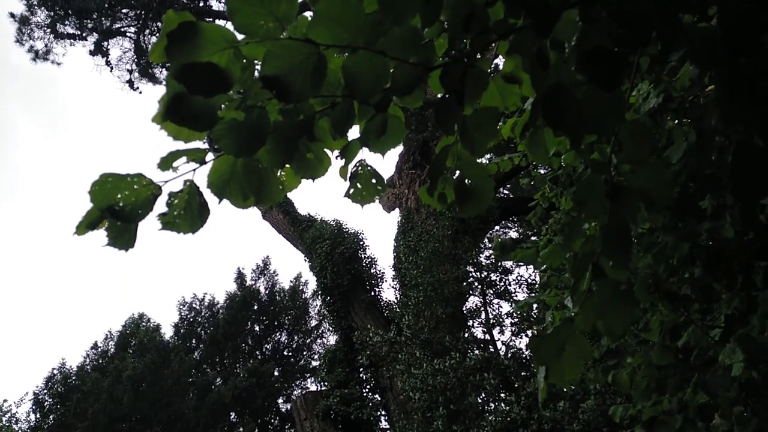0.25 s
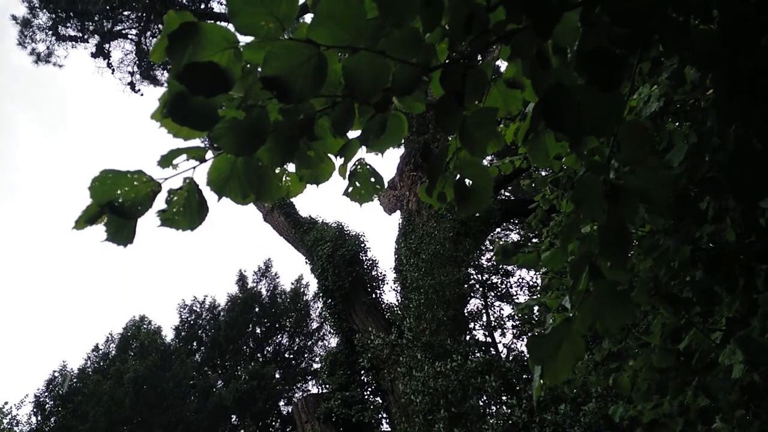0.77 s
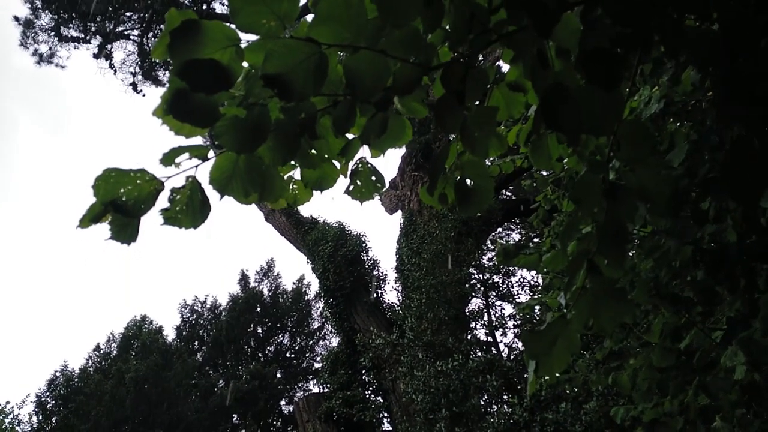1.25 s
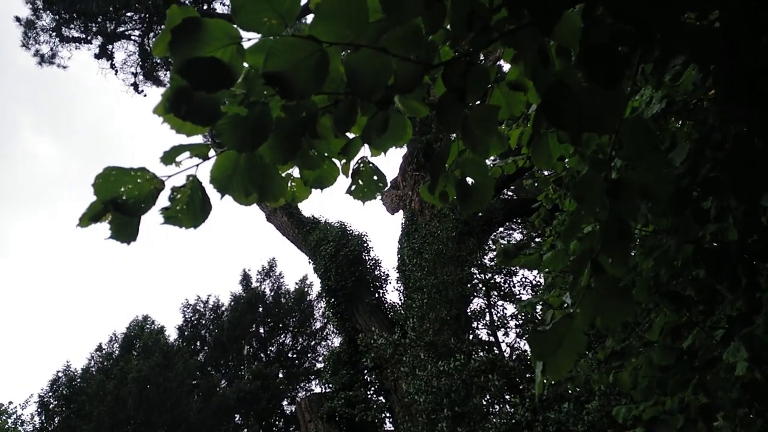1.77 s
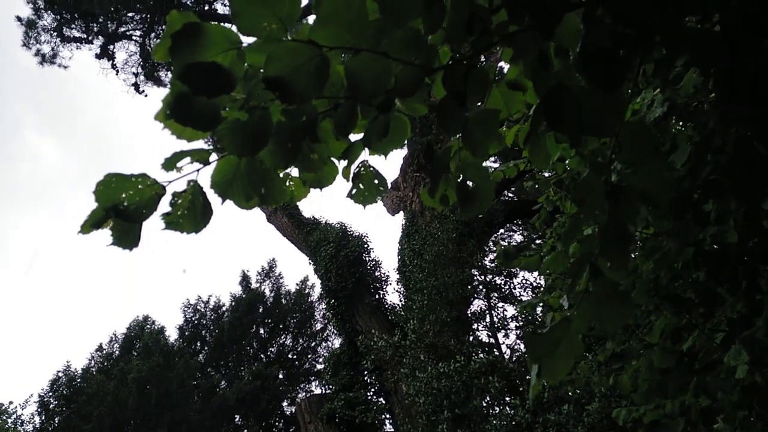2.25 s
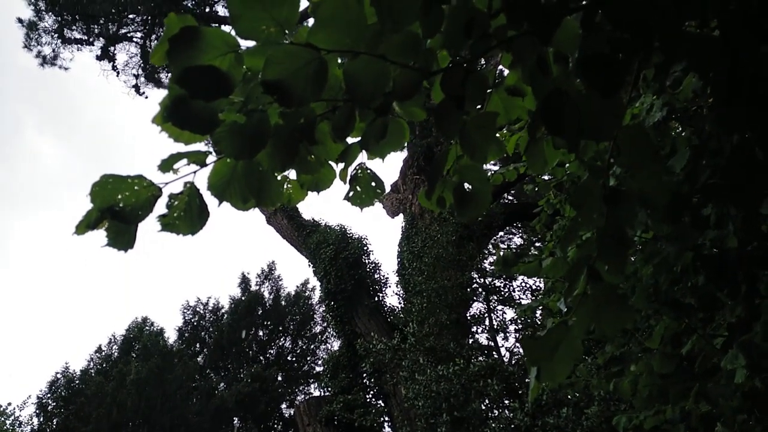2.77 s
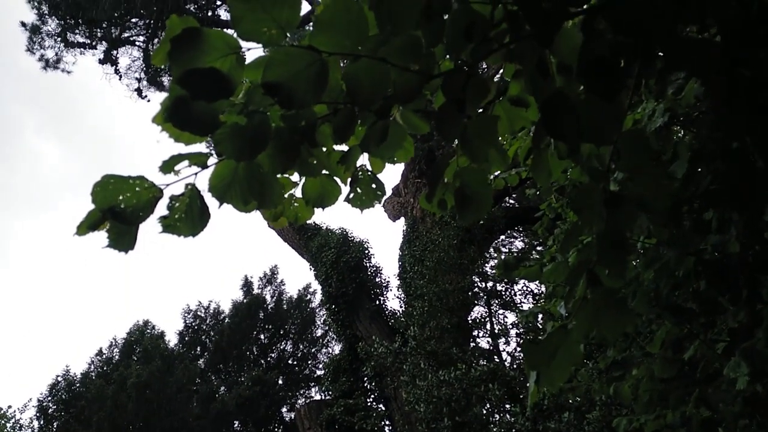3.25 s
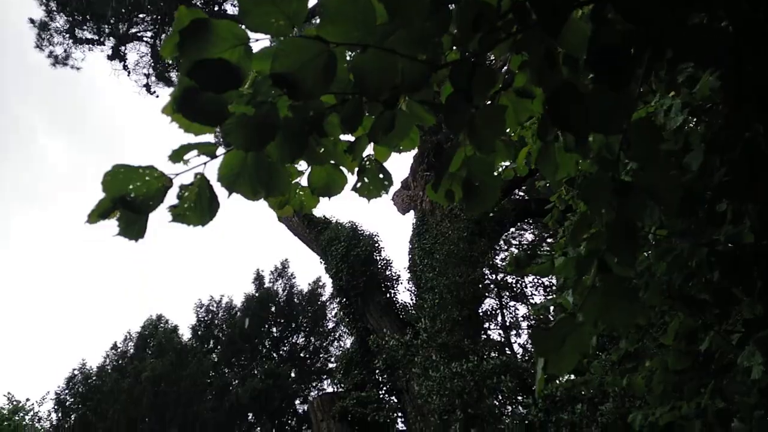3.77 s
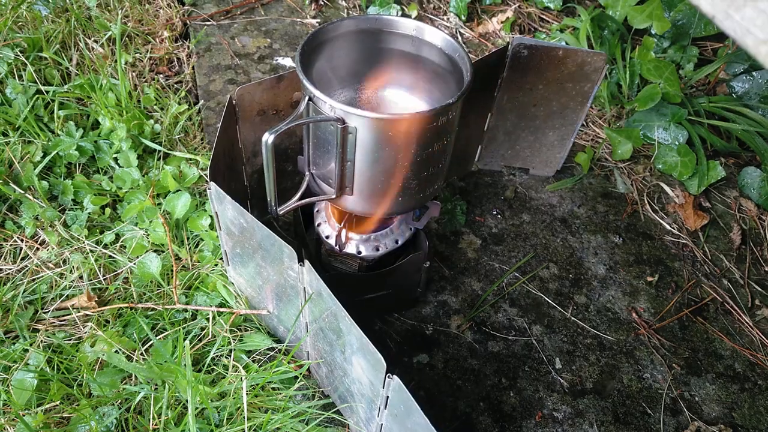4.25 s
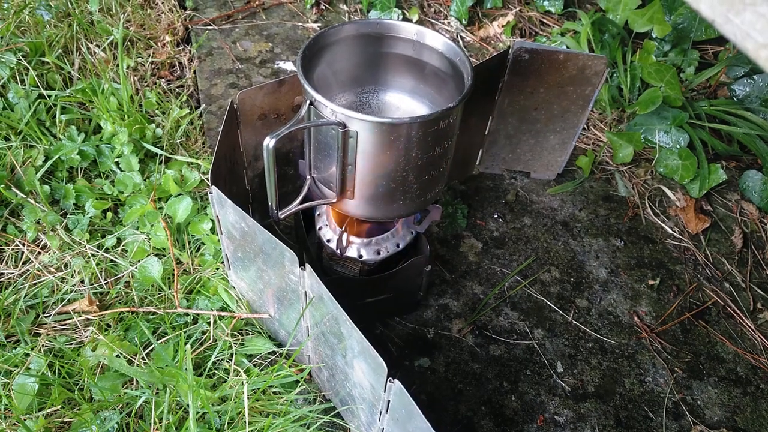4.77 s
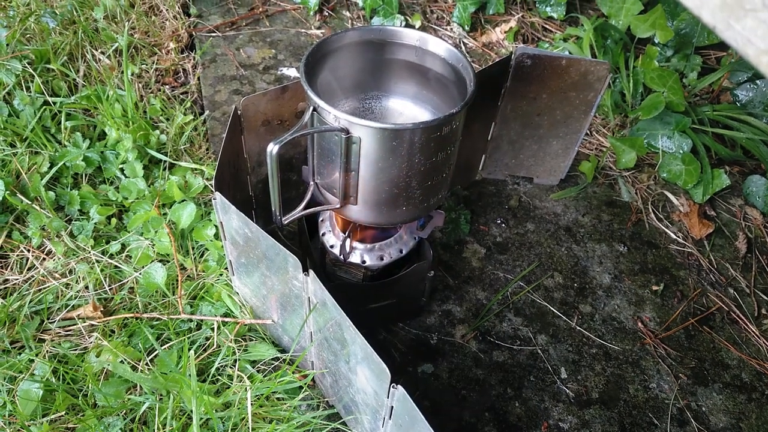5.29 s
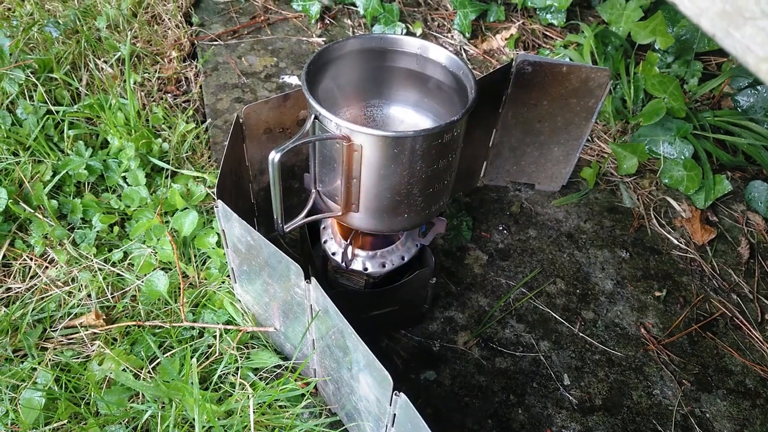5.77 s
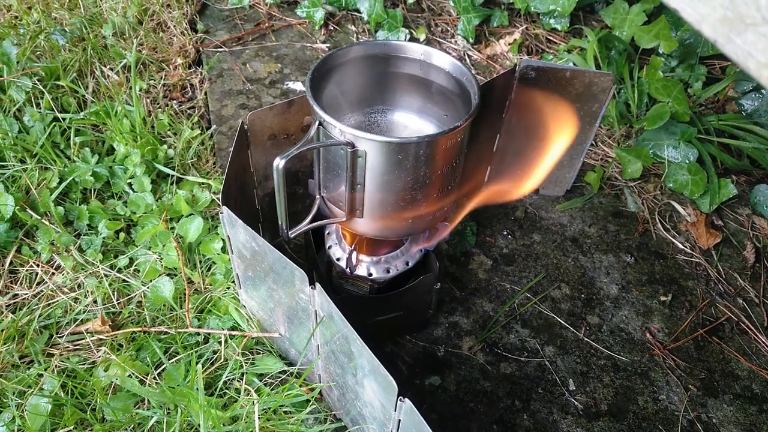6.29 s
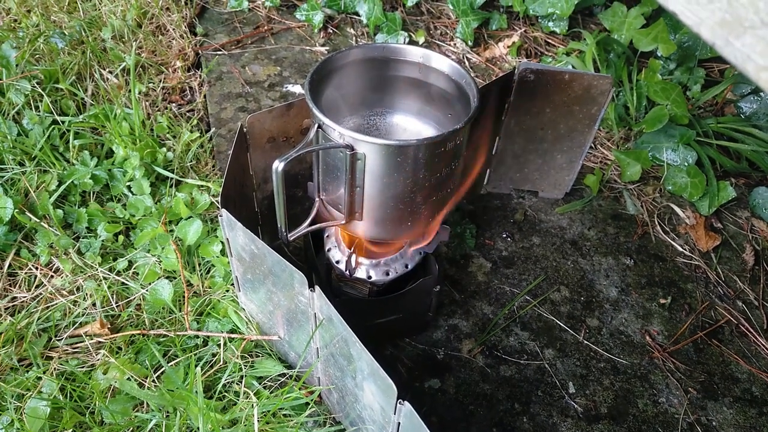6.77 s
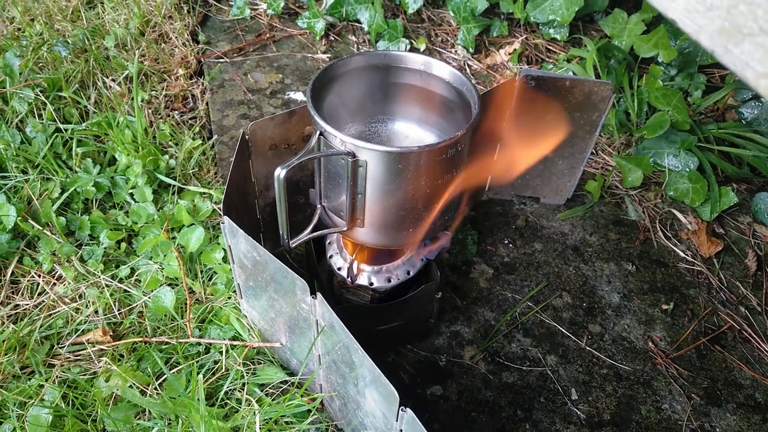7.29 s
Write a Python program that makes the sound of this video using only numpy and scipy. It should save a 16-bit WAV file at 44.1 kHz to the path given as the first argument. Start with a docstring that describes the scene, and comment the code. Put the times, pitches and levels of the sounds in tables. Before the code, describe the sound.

Dense steady rain patters on broad leaves overhead, then after a split-second gap turns quieter and finer on grass, with close drips and plinks.

```python
"""Countless drops patter overhead in a broad-leaved tree, with nearer drips, a faint swelling hum and soft low bumps.
After a very short near-silence the rain is quieter and finer, on a lawn beside a hot pot: drips tap leaves and soil,
some plink into water and a few sizzle. Far rain is filtered noise; near rain is a sum of short damped sines.
Drips add leaf modes and bursts of noise, plinks are gliding bubble tones, and sizzles are fluttering noise."""
import sys
import numpy as np
from scipy import signal
from scipy.fft import rfft, irfft, next_fast_len
from scipy.io import wavfile
from scipy.ndimage import uniform_filter1d, map_coordinates

SR = 44100
rng = np.random.default_rng(int(sys.argv[2]) if len(sys.argv) > 2 else 0)


def inscribe(sig):
    """Save sig as 16-bit PCM at rate SR to the path in sys.argv[1].

    A 1-D sig is mono; a 2-D sig holds one channel per row.
    Samples are clipped to [-1, 1] before scaling.
    """
    pcm = np.round(np.clip(np.atleast_2d(sig).T, -1, 1) * 32767)
    wavfile.write(sys.argv[1], SR, pcm.astype(np.int16))


N = 332060

# Positive lean is to the left. Levels are those before the colour and scene gains. Nearest drips, most on leaf
# or soil; the rows at 0.2785 s and 6.1692 s are bubbles ringing in water, made the same way: start_s,
# tap_pitch_hz, ring_cycles, tap_level_db, splash_pitch_hz, splash_level_db, lean_db
NEAR_DRIPS = [(0.2785, 2500, 7, -39, 1600, -35.5, 7.5), (0.3932, 2250, 7, -39, 2000, -40, 1.5),
              (0.487, 2100, 2.5, -40, 3500, -45, 1), (0.751, 4000, 0.62, -45, 7000, -44, 0),
              (0.8504, 7180, 3, -48, 6000, -37, 0), (0.9295, 1100, 3.3, -41, 4200, -37, 0),
              (1.1006, 1250, 2.6, -35.5, 3800, -32.5, 3), (1.8485, 1030, 2.5, -41, 3000, -52, 1),
              (3.4668, 1030, 2.7, -41, 3000, -48, 2), (3.6762, 2400, 1.5, -38, 4000, -46, 7),
              (3.8706, 1600, 2, -39, 3000, -49, 11), (4.1145, 650, 1.8, -46.5, 2000, -57, -1),
              (4.151, 1010, 1.3, -48, 4000, -47, 10), (4.2492, 2900, 3, -50, 1500, -52, 2),
              (4.4205, 1550, 0.9, -38, 1700, -38, 0), (4.4222, 225, 0.74, -40.5, 750, -46, -8),
              (4.448, 6000, 3, -46, 7800, -45, -3), (4.5156, 1800, 2, -46, 2800, -45, 2),
              (4.747, 820, 1.3, -46, 1700, -47.5, 1), (4.781, 890, 2.2, -47.5, 2000, -54, -2),
              (4.8845, 3500, 11, -45, 3500, -52, -2), (4.9327, 620, 2.1, -50, 2800, -46, 4),
              (4.9912, 550, 0.81, -49, 6800, -42.5, 0), (4.9917, 3150, 6, -39, 2200, -38, -3),
              (5.124, 1650, 3, -45, 1600, -47, 0), (5.2404, 1350, 2.5, -39, 7000, -43, 3),
              (5.2408, 2920, 7, -43.5, 1500, -39, 3), (5.2706, 1900, 3, -43, 5500, -44, 0.5),
              (5.3675, 3670, 4, -46.5, 5500, -48, 5), (5.3929, 1510, 1.4, -41, 2100, -44, 0.5),
              (5.4644, 620, 1.6, -52, 1500, -55, -1), (5.5203, 4600, 3, -45, 3800, -43, -2),
              (5.6312, 1400, 1.2, -45, 1400, -51, -2), (5.6392, 2500, 3, -48, 900, -48, -1),
              (5.8362, 840, 2.1, -41.5, 1500, -53, 1), (6.1692, 1150, 5.2, -40, 2200, -37, 4.5),
              (6.5533, 824, 1.7, -39.5, 1300, -40, 5), (6.5846, 600, 2.6, -43, 1200, -57, 4),
              (6.6772, 6800, 5, -48, 8000, -48, -4), (6.7066, 1750, 2, -46, 2000, -49, -1),
              (6.7378, 3200, 4, -42.5, 4500, -38, -3), (6.8008, 560, 1.6, -40, 3800, -37, 0),
              (6.804, 330, 1.3, -47, 600, -43, -1), (7.1968, 3080, 5.4, -37.5, 3200, -39, -3.5),
              (7.2335, 1400, 0.99, -44, 4170, -38.5, 0), (7.2652, 660, 3.3, -48, 2500, -44, 1),
              (7.3205, 760, 1.8, -40.5, 1200, -39, 4), (7.3284, 640, 1.7, -46.5, 1500, -50, -3),
              (7.3465, 4700, 4, -49, 6200, -44, -8), (7.3676, 2000, 1.3, -41, 6360, -38.5, 4),
              (7.446, 2250, 3, -50, 6000, -44, 1), (7.503, 1140, 1.6, -42, 650, -37, 2),
              (7.5096, 1710, 2.7, -39.5, 3900, -40.5, 2), (7.5108, 560, 2.3, -42.5, 1100, -38, 1)]
# Water boiling off the hot pot: start_s, length_s, level_db
POT_SIZZLES = [(5.51, 0.035, -49), (6.837, 0.014, -42), (6.85, 0.045, -39.5)]
# Gain as the lawn opens: time_s, gain_db
LAWN_OPENING = [(3.958, -18), (4.0, -11), (4.07, -10.5), (4.1, -6), (4.15, -3)]
# Relative spectra of the far drops over the tree and the lawn: frequency_hz, level_db (per Hz)
CROWN_SPECTRUM = [(15, -62), (25, -65), (59, -17.5), (75, -18.5), (119, -22), (305, -13), (410, -8.5),
                  (469, -7.5), (648, -2.5), (2120, -1), (5140, -6.5), (8350, -12.5), (9550, -16.5),
                  (11500, -29.5), (15500, -30)]
LAWN_SPECTRUM = [(25, -33), (58, -6), (130, -11.5), (230, -12.5), (350, -9), (470, -2.8), (650, -1.5),
                 (950, -4), (1600, -1.5), (2800, -3.5), (7200, -5.5), (9300, -12.5), (11200, -21.5),
                 (15500, -26.5)]
# Left-right balance of the rain in each place: frequency_hz, lean_db
CROWN_BALANCE = [(60, 1), (200, -0.5), (700, 0), (2000, 3), (5000, 2), (8000, -3), (12000, -.5)]
LAWN_BALANCE = [(200, 1), (700, -0.5), (1500, 1.5), (3000, -0.5), (6500, -5.5), (12000, -1)]
# Likeness of the far rain at the two ears: frequency_hz, correlation (1 = identical)
EAR_LIKENESS = [(60, 0.92), (200, 1), (450, 0.93), (800, 0.6), (1200, 0.25), (1700, 0.042), (5000, 0.02)]
# Colour shared by all drops: frequency_hz, gain_db
DROP_COLOUR = [(80, -21.5), (220, -8.5), (500, 1), (8300, 1.5), (9500, -4.5), (11000, -13), (16000, -13)]
# Soft low bumps: start_s, pitch_hz, level_db, lean_db
SOFT_BUMPS = [(2.635, 58, -62, 6.5), (3.672, 72, -59, 26), (4.245, 120, -59, 0), (6.365, 110, -54, 0)]
# Bubbles trapped by drops in standing water; a big drop traps several:
# start_s, pitch_hz, glide_octaves_per_s, life_s, bubble_level_db,
# spray_delay_s, spray_width_s, splash_level_db, thud_level_db, lean_db
WATER_BUBBLES = [(5.8458, 2970, -2, 0.0034, -30.5, 0.0003, 0.00061, -31.5, -54, -2.5),
                 (5.8465, 8300, 0, 0.007, -45, 0.006, 0.006, -39, -66, -1),
                 (6.1659, 1053, 184, 0.0059, -30.5, 0.0031, 0.002, -34.5, -37.5, 4),
                 (6.1688, 3510, 244, 0.0041, -38.5, 0.0027, 0.0006, -38.5, -62, 7),
                 (6.1702, 5150, 0, 0.0035, -43, 0.00088, 0.001, -46, -62, 4)]
# Flurries of drops shed by a shaken leaf: centre_s, rise_db
LEAF_FLURRIES = [(4.25, 5), (4.65, 1), (4.845, 5), (5.11, 7.5), (5.31, 5), (5.505, 5), (6.005, 6),
                 (6.67, 3), (7.13, 2), (7.44, 8.5)]

CROWN_END_S, LAWN_START_S, PAUSE_DB = 3.9245, 3.958, -34
TOP_HZ = 15780  # upper limit of the whole sound
CROWN_DB, LAWN_DB = -38.5, -49  # reference levels for the rain layers
LAWN_GROWS_DB_PER_S = 0.41
FLURRY_S = 0.019  # time from the peak to 1/e of the rise in dB
RUMBLE_DB, RUMBLE_GROWS_DB_PER_S = -99, 6
HUM_START_S, HUM_ATTACK_S, HUM_HOLD_S, HUM_RELEASE_S = 1.81, 0.08, 0.54, 0.06
HUM_DB, HUM_SAG_DB_PER_S, HUM_HZ, HUM_RISE_HZ_PER_S = -65.5, 10, 68.6, 7
AIR_LEAN_DB = -5.0  # shared by hum and rumble

STRAY_PER_S, STRAY_HZ, STRAY_OCTAVES, STRAY_CYCLES = 24, 2000, 0.73, 1.66  # wet leaves are heavily damped
STRAY_SPREAD_DB, STRAY_SPLASH_DB, STRAY_LEAN_DB = 0.7, -3, 5
# second leaf mode: pitch, level and number of cycles relative to the first
OVERTONE_RATIO, OVERTONE_DB, OVERTONE_LASTS = 1.83, -12, 1.9
TAP_RISE_CYCLES = 0.26  # a soft drop takes a moment to flatten
KNOCK_HZ, KNOCK_CYCLES, KNOCK_DB = 617, 0.44, -14
THUD_HZ, THUD_CYCLES, THUD_LAG_S, THUD_DB = 223, 0.58, 0.0027, -17.5
CRACK_S, CRACK_DB, SPLASH_Q = 0.00032, 1, 1.5  # crack level is relative to its spray
BUBBLE_RISE_S = 0.00037
FALLBACK_DB, FALLBACK_S = -10, 0.011  # droplets falling back around the crater
PLINK_SPRAY_HZ, PLINK_SPRAY_Q = 5000, 0.71  # spray off open water is bright and broad


def amp(db):
    """Logarithmic level: decibels become an amplitude ratio."""
    return 10 ** (np.asarray(db) / 20)


def unit(x):
    """Normalization: bring the root-mean-square amplitude to 1."""
    return x / np.sqrt(np.mean(x ** 2) + 1e-20)


def along(points, hz):
    """Log-frequency interpolation: read a value between given frequencies."""
    frequencies, values = np.transpose(points)
    return np.interp(np.log(hz + 1), np.log(frequencies + 1), values)


def curve(points):
    """Piecewise-linear control: one value per sample from (time, value) points."""
    times, values = np.transpose(points)
    return np.interp(np.arange(N) / SR, times, values)


def wobble(rate):
    """Smooth random modulation: a spline through random knots, rate knots a second."""
    knots = rng.standard_normal(int(N * rate / SR) + 4)
    return map_coordinates(knots, [np.arange(N) * rate / SR])


def filtered(x, response):
    """Linear filtering: multiply the spectrum by a function of frequency."""
    m = next_fast_len(N + 8192)
    spectrum = rfft(x, m) * response(np.fft.rfftfreq(m, 1 / SR))
    return irfft(spectrum, m)[..., :N]


def sides(lean_db):
    """Interaural level difference: split a lean equally between the left and right gains."""
    return amp(np.array([lean_db, -lean_db]).reshape(2, -1) / 2)


def coloured(x):
    """Spectral weighting: give drops their common colour."""
    return filtered(x, lambda hz: amp(along(DROP_COLOUR, hz)))


def ring(t, hz, cycles, hold=1):
    """Damped oscillation: a sine falls to 1/e in so many cycles; hold > 1 sustains it, then stops it."""
    turns = np.maximum(t, 0) * hz
    return np.sin(2 * np.pi * turns) * np.exp(-(turns / cycles) ** hold)


def wash(spectrum, patchy_db):
    """Incoherent superposition: far drops merge into patchy noise, most alike at both ears at low pitch."""
    bins = signal.stft(rng.standard_normal((2, N)), nperseg=512)[2]
    field = uniform_filter1d(rng.standard_normal(bins.shape[1:]), size=7, axis=0)
    field = uniform_filter1d(field, size=6, axis=1)
    patchy_bins = bins * amp(patchy_db * unit(field))
    pair = signal.istft(patchy_bins, nperseg=512)[1][:, :N]

    def mid_side_response(hz):
        """Stereo coherence: correlation sets the side-to-mid ratio."""
        width = np.tan(np.arccos(np.clip(along(EAR_LIKENESS, hz), -.9, 1)) / 2)
        return amp(along(spectrum, hz)) * np.array([np.ones_like(hz), width])

    mid, side = filtered(pair, mid_side_response)
    return unit(np.array([mid + side, mid - side]))


def patter(rate, centre_hz, spread, cycles, size_db, ear_lag_s=0.0004):
    """Random impulse process: damped taps differ in time, pitch, size, direction and damping."""
    draws = rng.random((int(rate * N / SR), 5))
    when, pitch, size, direction, damping = draws.T[:, :, None]
    hz = np.clip(centre_hz * np.exp(spread * np.log(pitch / (1 - pitch))), 300, 11000)
    # small drops are many, big ones few; a low tap lasts longer and so swings less
    gain = amp(size_db * np.minimum(-np.log(size), 4)) * np.sqrt(hz)
    k = np.arange(256)
    index = ((when * N).astype(int) + k).ravel()
    ears = []
    for side in (1, -1):
        toward = side * (2 * direction - 1)
        t = k / SR - ear_lag_s * (1 - toward) / 2
        taps = gain * amp(1.0 * toward) * ring(t, hz, cycles * (.5 + damping))
        ears.append(np.bincount(index, taps.ravel(), N)[:N])
    return unit(coloured(np.array(ears)))


def crown_rain():
    """Superposed impacts: dense patter on broad leaves overlies the wash of the whole tree."""
    far = amp(1.0) * wash(CROWN_SPECTRUM, patchy_db=1.0)
    leaves = amp(-5.0) * patter(rate=1400, centre_hz=2260, spread=0.339, cycles=1.2, size_db=2.0)
    ticks = amp(-20.5) * patter(rate=160, centre_hz=4800, spread=0.24, cycles=0.9, size_db=3.5)
    bunching = amp(0.35 * wobble(30))  # drops come down in little bunches
    rain = amp(CROWN_DB + 0.15 * wobble(7.7)) * (far + bunching * leaves + ticks)
    return filtered(rain, lambda hz: sides(along(CROWN_BALANCE, hz)))


def rumble():
    """Low-frequency air noise: band-shaped noise grows slowly as the air stirs."""
    t = np.arange(N) / SR
    shape = [(20, -6), (55, 4), (95, -2), (150, -21), (600, -80)]  # frequency_hz, gain_db
    air = filtered(rng.standard_normal((2, N)), lambda hz: amp(along(shape, hz)))
    return sides(AIR_LEAN_DB) * amp(RUMBLE_DB + RUMBLE_GROWS_DB_PER_S * t) * unit(air)


def add(track, s, sound):
    """Linear superposition: mix a stereo sound into the track at time s."""
    part = track[:, max(round(s * SR), 0):][:, :sound.shape[1]]
    part += sound[:, :part.shape[1]]


def arrival(lean_db, lag_per_db=.00004):
    """Interaural delay: time since a blow at each ear, later at the far one."""
    lag_s = lag_per_db * np.array([[max(-lean_db, 0)], [max(lean_db, 0)]])
    return np.arange(int(SR * .06)) / SR - lag_s


def blow(x):
    """Energy normalization: left-channel energy, spread over 4.5 ms, has rms 1."""
    return x * np.sqrt(.0045 * SR / np.sum(x[0] ** 2))


def thud(t):
    """Delayed compliance: the whole leaf gives way just after the tap."""
    return blow(ring(t - THUD_LAG_S, THUD_HZ, THUD_CYCLES))


def leaf_tap(t, hz, cycles):
    """Modal excitation: two damped leaf modes join the dull knock of the water landing."""
    rise = 1 - np.exp(-np.maximum(t, 0) * hz / TAP_RISE_CYCLES)
    first_mode = ring(t, hz, cycles, hold=2.5)
    overtone = amp(OVERTONE_DB) * ring(t, OVERTONE_RATIO * hz, OVERTONE_LASTS * cycles, hold=1.6)
    knock = amp(KNOCK_DB) * blow(ring(t, KNOCK_HZ, KNOCK_CYCLES))
    return blow(rise * (first_mode + overtone)) + knock


def foliage(x, echo_db=-14, echo_life=0.012):
    """Diffuse scattering: surrounding leaves return a decaying random echo."""
    echo = rng.standard_normal(x.shape) * np.exp(-np.arange(x.shape[1]) / SR / echo_life)
    echo /= np.linalg.norm(echo[0])
    return x + amp(echo_db) * signal.fftconvolve(x, echo, axes=1)[:, :x.shape[1]]


def droplets(envelope, hz, q):
    """Resonant noise: fine spray excites one broad resonance of the wet surface."""
    b, a = signal.iirpeak(hz, q, fs=SR)
    return blow(signal.lfilter(b, a, envelope * rng.standard_normal(envelope.shape)))


def splash(t, hz, splash_life=0.0059, scatter_db=-17, scatter_life=0.018):
    """Drop breakup: a crack, a burst of spray and a tail of falling droplets."""
    age = np.maximum(t, 0)
    crack = amp(CRACK_DB) * np.exp(-age / CRACK_S)
    spray = np.exp(-age / splash_life)
    scatter = amp(scatter_db) * np.exp(-age / scatter_life)
    return droplets((t > 0) * (crack + spray + scatter), hz, SPLASH_Q)


def drips(rows):
    """Impact and breakup: each drip flexes what it hits and bursts into spray."""
    track = np.zeros((2, N))
    for s, hz, cycles, tap_db, splash_hz, splash_db, lean_db in rows:
        t = arrival(lean_db)
        tap = amp(tap_db) * foliage(leaf_tap(t, hz, cycles) + amp(THUD_DB) * thud(t))
        spray = amp(splash_db) * splash(t, splash_hz)
        add(track, s, sides(lean_db) * (tap + spray))
    return coloured(track)


def stray_drips(tap_db):
    """Jittered impacts: lighter drips from all around strike leaves of varied size."""
    rows = []
    for k in range(int(STRAY_PER_S * N / SR)):
        size, pitch, wetness, direction = np.clip(rng.standard_normal(4), -2, 2)
        start_s = (k + rng.random()) / STRAY_PER_S
        hz = STRAY_HZ * 2 ** (STRAY_OCTAVES * pitch)
        db = tap_db + STRAY_SPREAD_DB * size
        splash_hz = min(2 * hz, TOP_HZ / 2)
        splash_db = db + STRAY_SPLASH_DB + STRAY_SPREAD_DB * wetness
        rows.append((start_s, hz, STRAY_CYCLES, db, splash_hz, splash_db, STRAY_LEAN_DB * direction))
    return drips(rows)


def hum():
    """Frequency and amplitude modulation: a distant tone swells, sags and stops while rising slightly."""
    age = np.arange(N) / SR - HUM_START_S
    gate_times = np.cumsum([0, HUM_ATTACK_S, HUM_HOLD_S, HUM_RELEASE_S])
    gate = np.interp(age, gate_times, [0, 1, 1, 0])
    turns = np.cumsum(HUM_HZ + HUM_RISE_HZ_PER_S * age) / SR
    tone = unit(np.sin(2 * np.pi * turns))
    level = amp(HUM_DB - HUM_SAG_DB_PER_S * age + 1.7 * wobble(8.7))
    return sides(AIR_LEAN_DB) * gate * level * tone


def bumps():
    """Strongly damped oscillation: low thuds fall to 1/e in 1.7 cycles."""
    t = np.arange(N) / SR
    return sum(amp(db) * sides(lean_db) * ring(t - s, hz, cycles=1.7)
               for s, hz, db, lean_db in SOFT_BUMPS)


def lawn_rain():
    """Superposed impacts: ticks on grass, taps on ivy and dull pats on soil overlie a slowly growing wash."""
    t = np.arange(N) / SR
    level_db = LAWN_DB + LAWN_GROWS_DB_PER_S * (t - LAWN_START_S)
    far = amp(2.5) * wash(LAWN_SPECTRUM, patchy_db=1.5)
    blades = amp(-5.0) * patter(rate=1300, centre_hz=4080, spread=0.332, cycles=1.5, size_db=1.1)
    ivy = amp(-6.0) * patter(rate=450, centre_hz=1610, spread=0.342, cycles=1.9, size_db=1.5)
    soil = amp(-14.0) * patter(rate=60, centre_hz=628, spread=0.12, cycles=1.7, size_db=2.0)
    shed_db = sum(db * np.exp(-((t - s) / FLURRY_S) ** 2) for s, db in LEAF_FLURRIES)
    flurry_db = 1.9 * wobble(24) + shed_db
    rain = amp(level_db + 0.43 * wobble(6)) * (far + soil + amp(flurry_db) * (blades + ivy))
    return filtered(rain, lambda hz: sides(along(LAWN_BALANCE, hz)))


def sizzles():
    """Boiling noise: water on hot metal makes a brief swell of tiny bursting bubbles."""
    swell = np.zeros(N)
    for s, length, db in POT_SIZZLES:
        swell += curve([(s, 0), (s + length / 4, amp(db)), (s + length * 3 / 4, amp(db)), (s + length, 0)])
    # frequency_hz, gain_db
    shape = [(600, -16), (2500, -1), (5000, -2), (8500, -6), (11000, -15), (16000, -19)]
    fizz = filtered(rng.standard_normal((2, N)), lambda hz: amp(along(shape, hz)))
    return swell * unit(fizz * amp(2.8 * wobble(900)))


def plinks():
    """Bubble resonance: trapped air rings with a steady or gliding pitch as the crater throws up spray."""
    track = np.zeros((2, N))
    for s, hz, glide, life, bubble_db, delay, width, splash_db, thud_db, lean_db in WATER_BUBBLES:
        t = arrival(lean_db)
        age = np.maximum(t, 0)
        pitch = (t > 0) * hz * 2 ** (glide * np.minimum(age, 2 * life))
        turns = np.cumsum(pitch, axis=1) / SR
        envelope = (1 - np.exp(-age / BUBBLE_RISE_S)) * np.exp(-(age / life) ** 3)
        bubble = amp(bubble_db) * blow(np.sin(2 * np.pi * turns) * envelope)
        fallback = (t > delay) * amp(FALLBACK_DB) * np.exp(-age / FALLBACK_S)
        puff = np.exp(-((t - delay) / width) ** 2) + fallback
        spray = amp(splash_db) * droplets((t > 0) * puff, PLINK_SPRAY_HZ, PLINK_SPRAY_Q)
        body = foliage(bubble + amp(thud_db) * thud(t))
        add(track, s, sides(lean_db) * (body + spray))
    return coloured(track)


def scene():
    """Sequential superposition: the tree, a short near-silence, then the lawn fading in."""
    t = np.arange(N) / SR
    near = drips(NEAR_DRIPS) + plinks() + bumps()
    tree = crown_rain() + near + hum() + rumble() + stray_drips(tap_db=-46.5)
    lawn = lawn_rain() + near + sizzles() + stray_drips(tap_db=-51.5)
    opening = np.where(t > LAWN_START_S, amp(curve(LAWN_OPENING)), amp(PAUSE_DB))
    return np.where(t < CROWN_END_S, tree, opening * lawn)


def record(dry):
    """Band limitation: remove everything at and above the upper limit."""
    return filtered(dry, lambda hz: hz < TOP_HZ)


dry = scene()
out = record(dry)
inscribe(out)
```